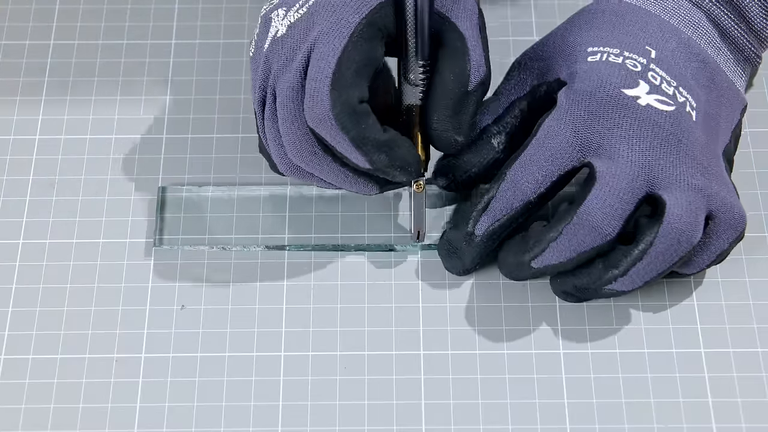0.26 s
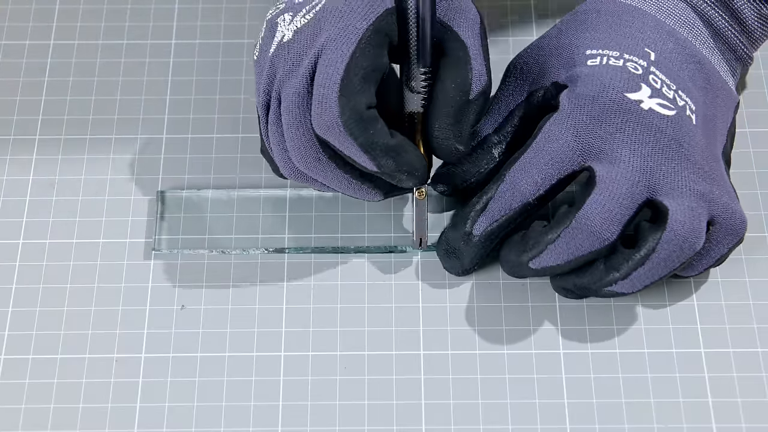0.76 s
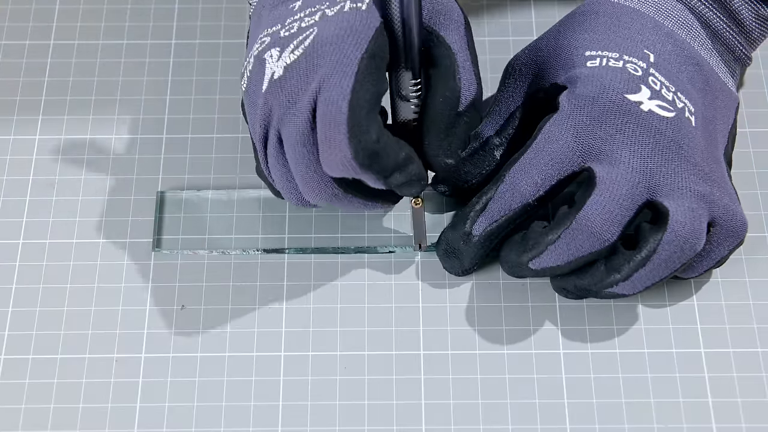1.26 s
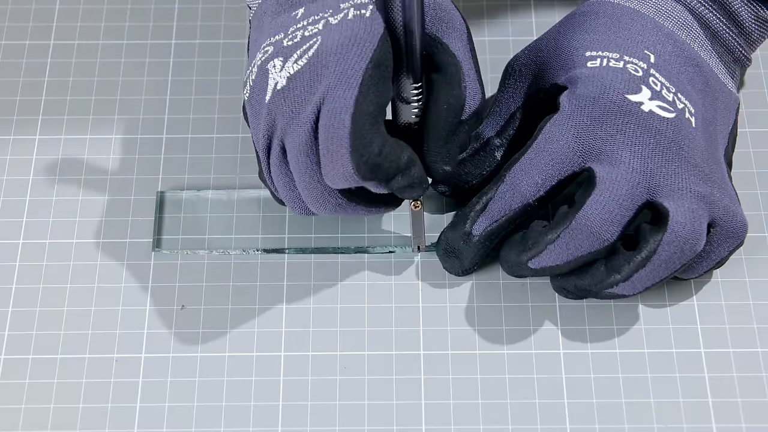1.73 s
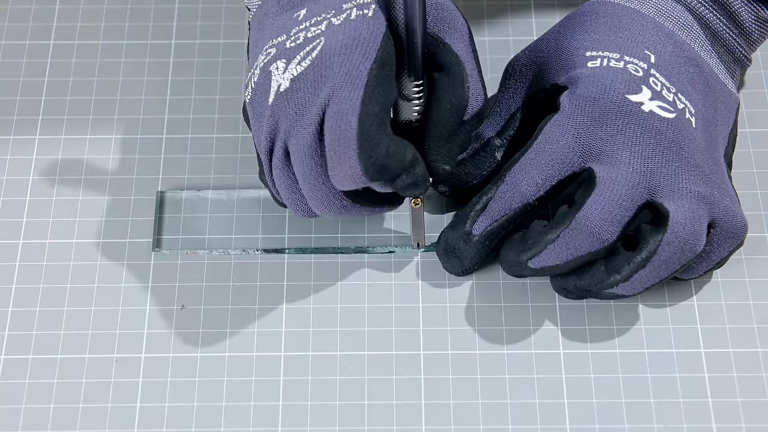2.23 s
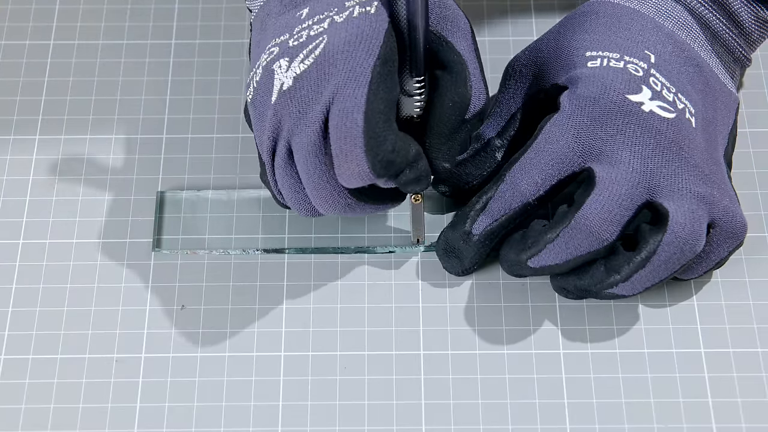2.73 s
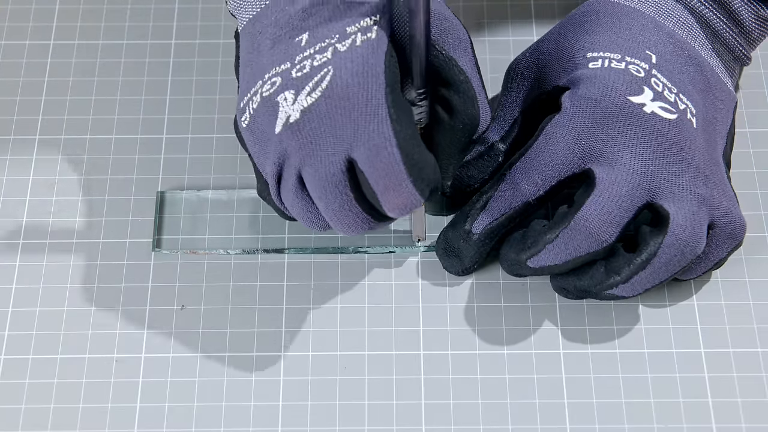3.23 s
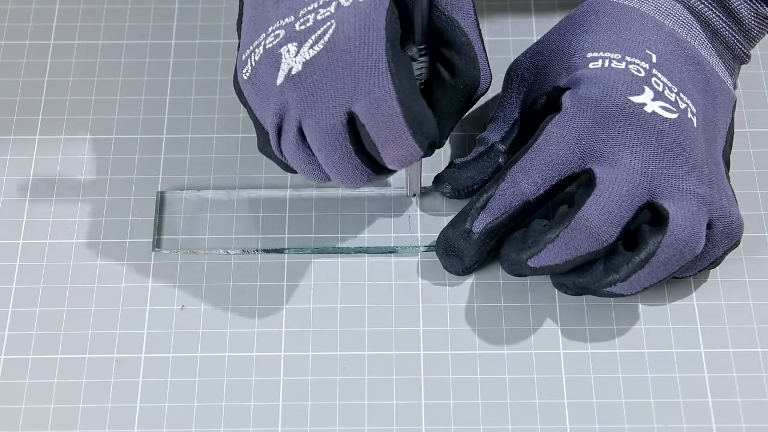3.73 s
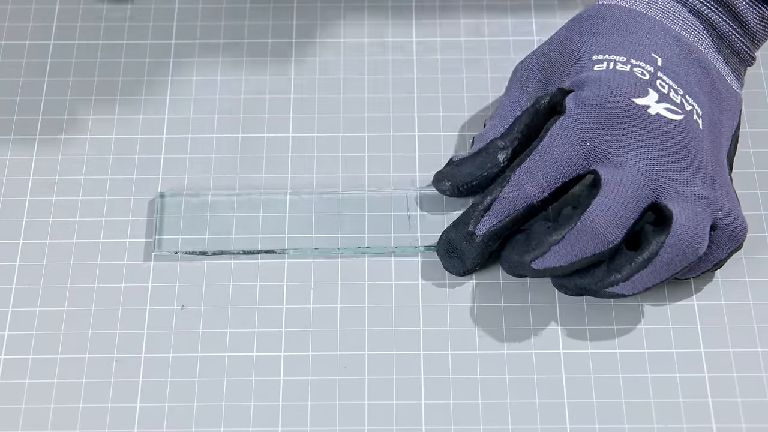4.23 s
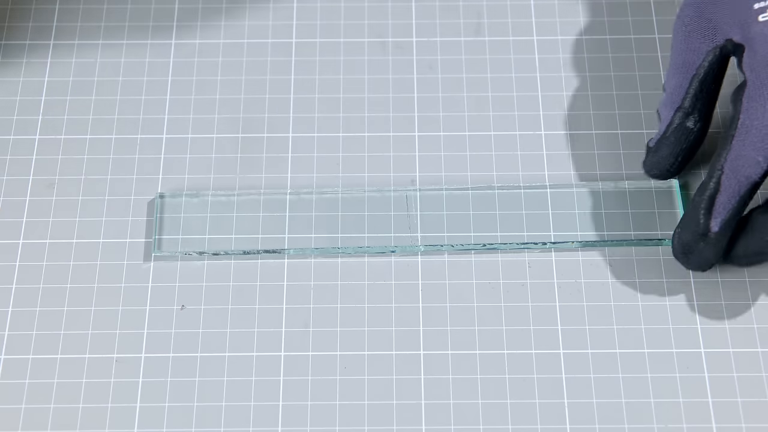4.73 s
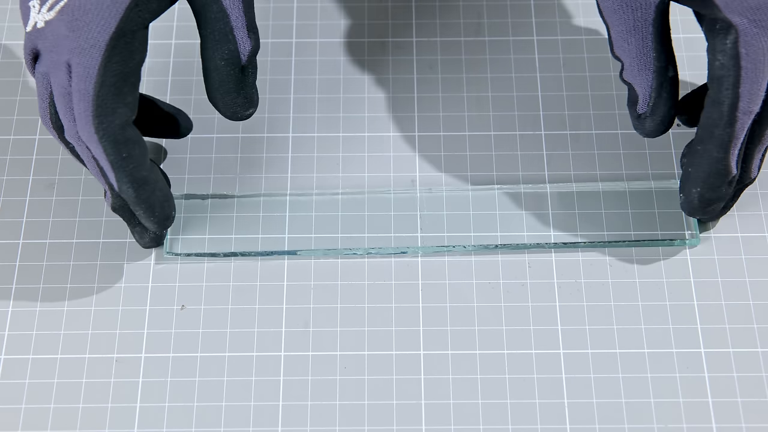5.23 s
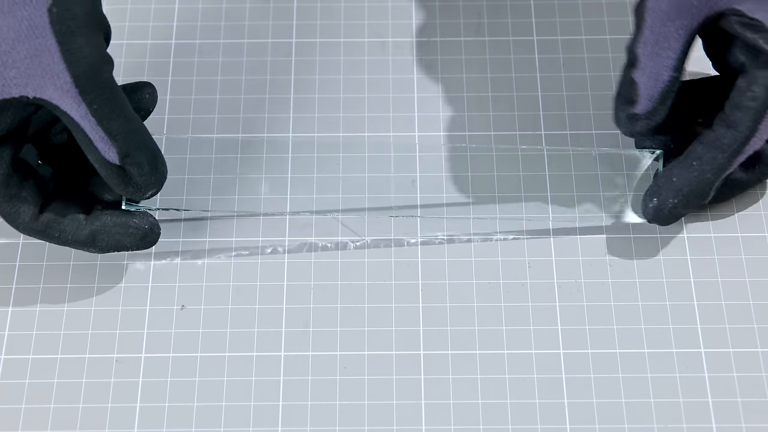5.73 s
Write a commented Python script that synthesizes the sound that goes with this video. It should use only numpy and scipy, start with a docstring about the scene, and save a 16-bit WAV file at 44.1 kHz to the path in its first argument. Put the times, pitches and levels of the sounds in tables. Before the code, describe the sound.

A quiet room, closely miked and nearly mono, with faint hiss and a soft rumble that swells and dips. Tiny taps come at 0.6 and 1.0 s, the second clearer with a soft glove rub. From 1.4 to 3.2 s there are sparse, very faint gritty ticks and dull presses, with weak wavering low hums beneath. Between 3.2 and 3.7 s the scoring grows into a dense run of short, bright, crackly scratches with light knocks; one more slip comes at 3.85 s. At 3.9 s a brief bright hiss and soft tick lead into by far the loudest sound, a sharp, dry snap ringing the table with a short room tail. A small tick follows at 4.3 s. From 4.6 to 5.0 s the cutter is laid down, a clear tap then rapid clattering bounces and skids. Soft grainy glove brushes run from 5.05 to 5.5 s, with a light tap at 5.8 s.

```python
"""A wheel cutter scores a glass strip on a mat: short gritty slips, dense clicks ringing wheel and strip.
Ticks and thuds excite the modes of the table, loudest in a sharp snap led in by a bright hiss and a soft tick.
The cutter is later laid down, bouncing and skidding, as gloved hands brush the mat in soft grainy noise.
Under it lie a swelling low rumble, two wavering hums and hiss; a short room tail follows slips and blows."""
import sys
import numpy as np
from scipy import signal
from scipy.fft import rfft, irfft
from scipy.io import wavfile
from scipy.ndimage import uniform_filter1d

SR = 44100
rng = np.random.default_rng(int(sys.argv[2]) if len(sys.argv) > 2 else 0)


def generate_wav(sig):
    """Save sig (samples, or channels by samples) to the path in sys.argv[1] as 16-bit PCM at SR."""
    pcm = np.round(np.clip(np.atleast_2d(sig).T, -1, 1) * 32767).astype(np.int16)
    wavfile.write(sys.argv[1], SR, pcm)


N = 264159  # samples


def gain_of(db):
    """Decibels to amplitude."""
    return 10 ** (np.asarray(db) / 20)


def evened(x):
    """Scales to rms 1."""
    return x / np.sqrt(np.mean(x ** 2) + 1e-20)


def read(points, hz):
    """Reads a curve of (frequency, value) points on a log-frequency axis."""
    point_hz, value = np.transpose(points)
    return np.interp(np.log(hz + 1), np.log(point_hz + 1), value)


def add(mix, start_s, sound):
    """Adds a sound into the mix at its start time."""
    part = mix[round(start_s * SR):][:len(sound)]
    part += sound[:len(part)]


def noise(points, size=N):
    """White noise shaped by the given spectrum, rms 1."""
    hz = np.fft.rfftfreq(size, 1 / SR)
    spectrum = rfft(rng.standard_normal(size)) * gain_of(read(points, hz))
    return evened(irfft(spectrum, size))


def ringing(modes, signs=1):
    """Struck body: a sum of exponentially dying sines, peak 1."""
    hz, db, t60 = np.transpose(list(modes))
    t = np.arange(SR // 5)[:, None] / SR
    partials = signs * gain_of(db - 60 * t / t60) * np.sin(2 * np.pi * hz * t)
    x = partials.sum(1)
    return x / abs(x).max()


def rumble():
    """Low noise of the quiet room, swelling along a level curve."""
    # swells: (time [s], level [dB])
    rumble_levels = [(0.0, -69.5), (0.5, -71.5), (0.93, -71.5), (1.42, -68.5), (1.65, -67), (2.02, -62.5),
                     (2.15, -63), (2.88, -63.5), (3.28, -61), (3.74, -64.5), (3.9, -65.5), (4.44, -67),
                     (4.64, -66), (4.84, -60), (5.44, -64.5), (5.57, -62.5), (5.69, -63), (5.99, -64)]
    # spectrum: (frequency [Hz], relative density [dB])
    rumble_spectrum = [(12, -48), (20, -0.5), (32, -14.5), (65, 5.5), (135, 0.5), (157, -0.5), (195, -5.5),
                       (304, -19), (377, -17), (425, -34.5), (500, -20.5), (650, -50.5), (1100, -120)]
    t = np.arange(N) / SR
    return noise(rumble_spectrum) * gain_of(np.interp(t, *np.transpose(rumble_levels)))


def hiss():
    """Steady noise of the microphone, the same in both channels."""
    # spectrum: (frequency [Hz], relative density [dB])
    hiss_spectrum = [(120, -25), (200, -9), (400, -10.5), (700, -9), (1320, -12), (1700, -14),
                     (2200, -14.5), (8000, -15.5), (16000, -16)]
    return gain_of(-74) * noise(hiss_spectrum)


def side_hiss():
    """Faint steady noise, heard with opposite sign in the two channels."""
    # spectrum: (frequency [Hz], relative density [dB])
    side_spectrum = [(12, -28.5), (20, -16), (222, -6.5), (718, -5), (1530, -9), (2200, -9.5), (6540, -9.5),
                     (16000, -9)]
    return gain_of(-76) * noise(side_spectrum)


def rubs():
    """Faint rubs of a glove: short swells of noise in one resonance."""
    # rubs: (start [s], length [s], level before the swell [dB], centre [Hz], width [Hz])
    rub_events = [(0.385, 0.08, -79, 1290, 350), (0.918, .04, -85, 1340, 200),
                  (1.082, 0.051, -81, 1500, 500)]
    out = np.zeros(N)
    for start, length, db, hz, width in rub_events:
        band = [(hz - 2 * width, -25), (hz - width / 2, -3), (hz, 0),
                (hz + width / 2, -3), (hz + 2 * width, -25)]
        size = round(length * SR)
        swell = signal.windows.tukey(size, .5)
        add(out, start, gain_of(db) * noise(band, size=size) * swell)
    return out


def press_rows(presses):
    """Gives presses the columns of drops; pitch sets their mode lifts, and no cutter rings."""
    rows = []
    for s, thud_db, knock_hz, tick_db in presses:
        lift_db = 11 * abs(np.log2(knock_hz / 700))  # away from the middle modes, more on one pitch
        deep_db = -5 * np.log2(knock_hz / 600)  # lower presses reach the deep modes better
        rows.append((s, thud_db, knock_hz, lift_db, tick_db, .014, -np.inf, deep_db))
    return rows


def table_thud(modes, knock_hz, lift_db, deep_db, light):
    """The table top rings in its modes, strongest near the knock pitch; light blows die sooner."""
    hz, db, t60 = np.transpose(modes)
    # random mode levels vary the colour of light thuds
    varied_db = 2.5 * light * rng.standard_normal(len(hz))
    # random mode signs let light thuds start without one big swing
    signs = np.where(rng.random(len(hz)) < .35 * light, -1, 1)
    near_db = lift_db * np.exp(-(np.log2(hz / knock_hz) / 0.23) ** 2)
    level_db = db + varied_db + near_db + deep_db * (hz < 250)
    return ringing(zip(hz, level_db, t60 * (.7 if light else 1)), signs)


def noisy_tick(colour, tick_db, t60):
    """A click and dying noise; louder ticks are brighter, long ones start softly with a weaker click."""
    t = np.arange(2048) / SR
    hz = np.fft.rfftfreq(4096, 1 / SR)
    grit = rng.standard_normal(len(t)) * np.clip(t / (0.046 * t60), 0, 1) * gain_of(-60 * t / t60)
    raw_tick = (t == 0) * min(.01 / t60, 1) ** 2 + .13 * grit
    top_hz = 4540 * 2 ** ((tick_db + 40) / 20)  # one octave per 20 dB
    ratio = 1j * hz / top_hz
    low_pass = 1 / (1 + np.sqrt(2) * ratio + ratio ** 2) ** 2
    tick = irfft(rfft(raw_tick, 4096) * colour * low_pass)[:len(t)]
    return tick / abs(tick).max()


def blows():
    """Each blow is a thud of the table, a noisy tick and, outside the presses, a ring of the cutter."""
    # table modes: (frequency [Hz], relative level [dB], t60 of a hard blow [s])
    table_modes = [(88, -13, 0.044), (108, -9, .09), (132, -8.5, 0.064), (161, -5.5, 0.054),
                   (225.5, -8, 0.09), (281.4, -5, 0.067), (340, -11.5, 0.068), (380.7, -7, 0.077),
                   (443, -14, .1), (469.7, -9, 0.11), (534, 2.5, 0.053), (620, -7, 0.11), (676, -6, 0.12),
                   (785.4, 2, 0.024), (788, -20.5, 0.089), (888.5, -6.5, 0.073), (949, -26, .15),
                   (980, -16, 0.11), (1063.3, -6, .12), (1130, -14.5, .1), (1283, -11, 0.031),
                   (1435, -9, 0.053), (1590, -9, 0.054), (1760, -26.5, 0.037), (2000, -20, 0.053),
                   (2184, -7, 0.025), (2274, -24.5, .06)]
    # cutter modes: (frequency [Hz], relative level [dB], t60 [s])
    cutter_modes = [(3118, -4, .045), (3594, 0, .028), (4883, -11, .025), (4950, -23, .1), (5475, -22, .03),
                    (6990, -7, .016), (6900, -24, .11), (8900, -24, .012), (11600, -25, .012)]
    # tick spectrum: (frequency [Hz], relative density [dB])
    tick_spectrum = [(600, -40.5), (1200, -2.5), (2200, 1), (2600, 0), (3100, 1.5), (4500, -3.5),
                     (5600, -2), (6500, -5), (7400, -1.5), (9500, -4), (12500, -6), (15500, -17.5)]
    # light presses of hand and wheel on the table:
    # (time [s], thud before smoothing [dB], knock pitch [Hz], tick [dB])
    presses = [(.557, -67, 700, -70), (1.011, -46.5, 700, -44), (1.401, -58.5, 442, -62),
               (1.453, -55, 1500, -56), (1.552, -63, 1200, -61.5), (1.945, -61, 600, -61.5),
               (2.119, -60, 1203, -53.5), (2.257, -56.5, 393, -75), (2.283, -53.5, 390, -75),
               (2.501, -48.5, 403, -63), (2.905, -63, 400, -80), (2.991, -57, 495, -72),
               (3.121, -56.5, 700, -63), (3.155, -55, 600, -67), (3.234, -49, 503, -64),
               (3.353, -49.5, 350, -52), (3.398, -49.5, 343, -50), (3.445, -48.5, 346, -57),
               (3.595, -47.5, 252, -61), (5.82, -53.5, 995, -46.5)]
    # the snap and later bounces, two of them led in by soft noisy ticks (3.903 s and 4.762 s):
    # (time [s], thud before smoothing [dB], knock pitch [Hz], lift near the pitch [dB], tick [dB],
    #  tick t60 [s], cutter ring [dB], lift of the deep modes [dB])
    snap_and_bounces = [(3.903, -26.5, 700, 11, -29, .022, -62, -17),
                        (3.9078, -2.5, 794, 11, -8.5, 0.012, -46, 3.5),
                        (3.9195, -20, 917, 6, -37, .012, -60, -1),
                        (4.5966, -33.5, 620, 9, -25, 0.015, -38.5, 4),
                        (4.601, -41, 620, 4, -32.5, 0.015, -45, 2.5),
                        (4.7018, -46, 700, 16, -37.5, 0.0026, -69, -4),
                        (4.762, -62, 700, 3, -37, 0.074, -49, -6),
                        (4.7681, -25.5, 620, 17, -26, .013, -59, -3),
                        (4.7717, -29.5, 287, 34, -52, 0.018, -52, -11),
                        (4.7804, -27.5, 400, -2, -45, 0.015, -67, -30),
                        (4.786, -21, 1320, 46, -31, 0.027, -60, -15),
                        (4.8302, -45, 1320, 3, -34.5, 0.031, -28.5, -6),
                        (4.8338, -29.5, 301, 17, -44, 0.014, -39.5, -7),
                        (4.859, -44, 500, -2, -66, 0.016, -61, 0),
                        (4.874, -34, 700, 10, -43, .02, -65, 10.5),
                        (4.89, -41, 600, -2, -39, 0.014, -51, 1),
                        (4.914, -33, 403, 3, -44.5, 0.023, -61, -6),
                        (4.932, -39, 397, 12, -67, 0.035, -63, -9),
                        (4.958, -42.5, 594, 5, -44, 0.012, -70, 2),
                        (4.984, -45.5, 400, 4, -55, .015, -75, -7),
                        (5.024, -49, 399, 6.5, -70, .044, -82.5, 4)]
    log_gain = np.log(gain_of(read(tick_spectrum, abs(np.fft.fftfreq(4096, 1 / SR)))))
    colour = np.exp(signal.hilbert(log_gain).conj())[:2049]  # causal: no sound before the click
    cutter, out = ringing(cutter_modes), np.zeros(N)
    cutter_t = np.arange(len(cutter)) / SR
    rows = press_rows(presses) + snap_and_bounces
    for s, thud_db, knock_hz, lift_db, tick_db, t60, ring_db, deep_db in rows:
        light = thud_db < -15
        thud = table_thud(table_modes, knock_hz, lift_db, deep_db, light)
        tick = noisy_tick(colour, tick_db, t60)
        ring = cutter * np.clip(cutter_t / (.05 * t60), 0, 1)  # starts more softly with a long tick
        # smoothing softens the thud, more in light blows with a long tick
        soft = signal.windows.hann(19 + int(25 * light * min(t60 / .03, 1)))
        add(out, s, -gain_of(thud_db) * np.convolve(thud, soft / soft.sum()))
        add(out, s, -gain_of(tick_db) * tick)
        add(out, s, gain_of(ring_db) * ring / abs(ring).max())
    # the table radiates little under its lowest mode
    return signal.sosfilt(signal.butter(4, 80, "highpass", fs=SR, output="sos"), out)


def room(x):
    """Reflections: sparse taps of random sign, each band dying at its own speed."""
    # reverberation: (frequency [Hz], t60 [s])
    room_decay = [(150, .2), (600, 0.27), (1500, 0.22), (4000, 0.16), (8000, 0.13), (11000, 0.057),
                  (15000, 0.073)]
    taps = np.zeros(SR // 2)
    slots = np.arange(100, SR // 2 - 20, 20)
    at = slots + rng.integers(0, 20, len(slots))
    taps[at] = rng.choice([-1., 1.], len(at))
    hz, t, bands = signal.stft(taps, SR, nperseg=256)
    decay = gain_of(-60 * t / read(room_decay, hz)[:, None])
    tail = signal.istft(bands * decay, SR, nperseg=256)[1]
    return signal.fftconvolve(x, tail / np.linalg.norm(tail))[:N]


def gloves_and_skids():
    """Soft grainy noise of sliding; each stroke mixes a dull, a bright and a low dragging layer."""
    # glove and drag spectra: (frequency [Hz], relative density [dB])
    glove_spectrum = [(500, -27.5), (900, -6), (1300, -5), (2000, -3), (3500, -2), (5000, -5), (7000, -12),
                      (15500, -36.5)]
    drag_spectrum = [(120, -12), (250, 6), (400, -2.5), (650, -3.5), (1000, -14.5), (2000, -63)]
    # soft noise of brushing gloves, and one noisy tail after a tap (1.021 s);
    # rise and fall span a tenfold change of amplitude:
    # (peak [s], level [dB], drag felt in the table [dB], rise [s], hold [s], fall [s], bright share [0-1])
    strokes = [(1.021, -68, -75, .005, .003, .065, .14), (1.093, -73, -74.5, .021, .028, .062, .11),
               (2.243, -62.5, -79, .005, .003, .032, .19), (2.271, -69.5, -67, .045, .022, .046, .25),
               (4.271, -73.5, -81, .11, .034, .013, .16), (4.391, -75.5, -78, .09, .012, .062, .14),
               (5.065, -60.5, -71, .038, .021, .17, .31), (5.151, -73, -65.5, .09, .038, .068, .14),
               (5.206, -64.5, -71, .024, .011, .16, .24), (5.269, -56.5, -71, .028, .005, .023, .31),
               (5.331, -70.5, -77, .058, .021, .09, .14), (5.506, -62, -77, .078, .044, .078, .01),
               (5.823, -63, -75, .008, .003, .021, .1), (5.811, -75.5, -81, .11, .042, .38, .14)]
    # the cutter skids after a bounce:
    # (peak [s], level [dB], drag felt in the table [dB], fall [s])
    skids = [(4.611, -56, -51, 0.092), (4.702, -64, -61, 0.28), (4.769, -46.5, -53, .05),
             (4.796, -53.5, -44, 0.042), (4.845, -51, -46, 0.017), (4.896, -54, -54, 0),
             (4.916, -58, -45, 0.036), (4.958, -69, -54, .06), (4.99, -68, -56.5, 0.13)]
    # skids rise in 10 ms, do not hold and are dull
    skid_rows = [(s, db, drag_db, 0.01, 0, fall, 0.031) for s, db, drag_db, fall in skids]
    dull, drag = noise(glove_spectrum), noise(drag_spectrum)
    bright = evened(np.diff(dull, 2, prepend=[0, 0]))
    slow = evened(uniform_filter1d(rng.standard_normal(N), size=200))
    grain = evened(gain_of(2.0 * slow))
    power = np.zeros((3, N))  # dull, bright, drag
    for s, db, drag_db, rise, hold, fall, share in strokes + skid_rows:
        t = np.arange(-2 * rise, hold + 2 * fall, 1 / SR)
        decades = np.where(t < 0, -t / rise, np.maximum(t - hold, 0) / fall)
        shape = gain_of(-20 * decades) ** 2
        share = np.clip(share, 0, 1)
        parts = [(1 - share) * gain_of(db) ** 2, share * gain_of(db) ** 2, gain_of(drag_db) ** 2]
        for layer, part in zip(power, parts):
            add(layer, s + t[0], part * shape)
    return (np.sqrt(power) * [dull, bright, drag]).sum(0) * grain


def hums():
    """Two sines whose pitch and level waver along curves."""
    # one list for each hum: (time [s], pitch [Hz], level [dB])
    hum_curves = [
        [(1.4, 153.3, -79), (1.65, 163.7, -72.5), (1.86, 162.2, -68.5), (2.12, 166.1, -64.5), (2.4, 156.5, -71),
         (2.52, 152, -71)],
        [(2.3, 110, -71), (2.4, 114.9, -72.5), (2.76, 117, -69), (2.87, 108, -73), (3.3, 112.5, -70)],
    ]
    t, out = np.arange(N) / SR, np.zeros(N)
    for rows in hum_curves:
        s, hz, db = np.transpose(rows)
        phase = 2 * np.pi * np.cumsum(np.interp(t, s, hz)) / SR
        hum = np.sqrt(2) * np.sin(phase)  # rms 1
        fade = np.clip(np.minimum(t - s[0], s[-1] - t) / 0.079, 0, 1)
        out += hum * gain_of(np.interp(t, s, db)) * fade
    return out


def glass_chips():
    """Chips of glass break in clumps: dense clicks of uneven size and random sign, rms 1."""
    chance, size, sign = rng.random(N), rng.exponential(1, N), rng.choice([-1., 1.], N)
    clicks = (chance < 9000 / SR) * gain_of(2 * np.minimum(size, 4)) * sign  # 9000 a second
    clumps = evened(uniform_filter1d(rng.standard_normal(N), size=60))
    return evened(clicks) * evened(gain_of(2.5 * clumps))


def score():
    """Dense clicks of breaking chips, shaped into short bursts, ring the modes of wheel and strip."""
    # slips of the wheel, and a bright hiss just before the snap (3.8977 s):
    # (start [s], level [dB], hold [s], lift of the treble modes [dB])
    slips = [(1.434, -64, .002, 2), (1.447, -64, 0.0057, 2), (1.547, -64.5, 0.0044, 3),
             (1.648, -63.5, 0.0018, -6), (1.941, -67, 0.0032, -8), (2.117, -57.5, 0.0026, 0),
             (2.18, -72, .005, -6), (2.234, -56.5, .001, 2), (2.25, -74, 0.019, 1), (2.278, -67, .008, 8),
             (2.466, -68, 0.019, 0), (2.497, -72, .004, 9), (2.515, -70.5, .004, 7),
             (3.237, -49, 0.00067, -2), (3.244, -56.5, 0.012, 0), (3.274, -53.5, 0.0036, 0),
             (3.299, -60.5, 0.0053, 3), (3.343, -48.5, .002, -1), (3.352, -51, 0.0057, 3),
             (3.361, -52.5, .017, 1.5), (3.39, -55.5, 0.014, -2), (3.413, -49.5, 0.0076, 1),
             (3.427, -52.5, 0.006, -2), (3.473, -49, 0.0047, -1), (3.487, -57, 0.0067, -1),
             (3.513, -55, 0.0044, 1), (3.544, -47.5, 0.0039, 0), (3.554, -54.5, 0.0023, 0),
             (3.567, -47.5, 0.0089, -2), (3.58, -48, 0.013, -2), (3.599, -59, .012, 0),
             (3.616, -51.5, 0.0207, -1.5), (3.69, -46, 0.0017, 0), (3.7, -52.5, 0.0045, 1),
             (3.849, -47, 0.0034, 2.5), (3.855, -56.5, 0.01, 3), (3.8977, -43, 0.0042, 11),
             (4.299, -55.5, 0.0024, 1.5)]
    # modes of wheel and strip: (frequency [Hz], width [Hz], relative density [dB])
    strip_modes = [(2295, 220, 2), (2630, 69, 0), (3080, 150, -2.5), (3930, 50, -8), (3813, 600, 2.5),
                   (4100, 67, -2), (4750, 180, 1.5), (5700, 440, -1.5), (6330, 790, -2), (6840, 270, -5.5),
                   (7160, 790, -7.5), (9200, 800, -10), (11000, 890, -11.5), (12880, 1000, -8.5),
                   (14200, 600, -14.5), (15300, 500, -14)]
    low, top, t = np.zeros(N), np.zeros(N), np.arange(SR // 5) / SR
    for s, db, hold, top_db in slips:
        # longer bursts start and end more slowly
        rise, t60 = 0.00042 + .5 * hold, .016 + 1.1 * hold
        fall_db = -60 * np.maximum(t - rise - hold, 0) / t60
        shape = np.clip(t / rise, 0, 1) * gain_of(db + fall_db)
        add(low, s, shape)
        add(top, s, shape * gain_of(top_db))
    chips = glass_chips()
    t, out = t[:2048], np.zeros(N)
    total = np.linalg.norm([gain_of(db) * np.sqrt(width) for hz, width, db in strip_modes])
    for hz, width, db in strip_modes:
        # soft start: steep skirts
        mode = t * np.exp(-1.5 * np.pi * width * t) * np.sin(2 * np.pi * hz * t)
        mode *= gain_of(db) * np.sqrt(width) / total / np.linalg.norm(mode)
        level = low if hz < 8500 else top
        out += signal.oaconvolve(chips * level, mode)[:N]
    return out


def scene():
    """One centred microphone; only a faint hiss differs between the channels."""
    scratch, knocks = score(), blows()
    tail = room(gain_of(-13.5) * scratch + gain_of(-13) * knocks)
    background = rumble() + hums() + hiss()
    mid = scratch + knocks + tail + gloves_and_skids() + rubs() + background
    side = side_hiss()
    return np.array([mid + side, mid - side])


def record(dry):
    """The microphone loses the deepest bass; then a steep low-pass limits the band."""
    thin = signal.sosfilt(signal.butter(2, 30, "highpass", fs=SR, output="sos"), dry)
    low_pass = signal.firwin(511, 15750, window=("kaiser", 9), fs=SR)
    return signal.oaconvolve(thin, low_pass[None], "same")


dry = scene()
out = record(dry)
generate_wav(out)
```